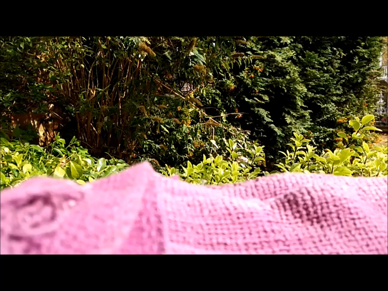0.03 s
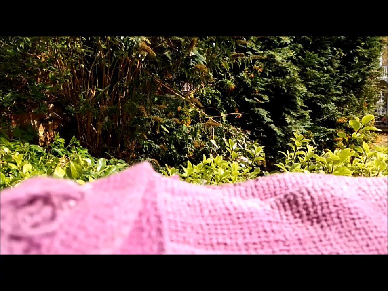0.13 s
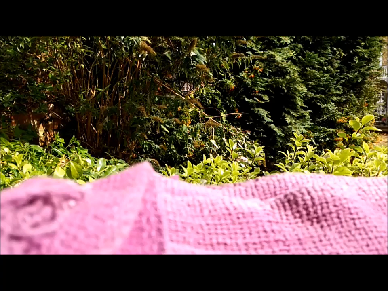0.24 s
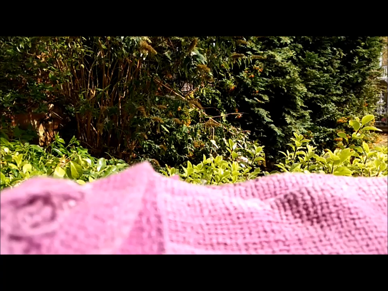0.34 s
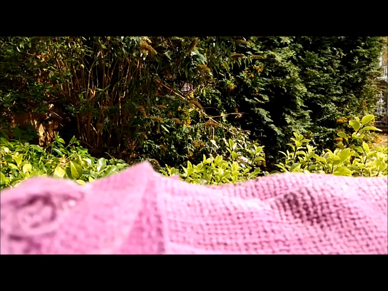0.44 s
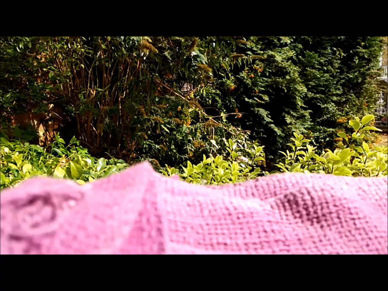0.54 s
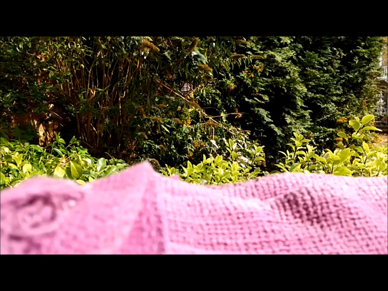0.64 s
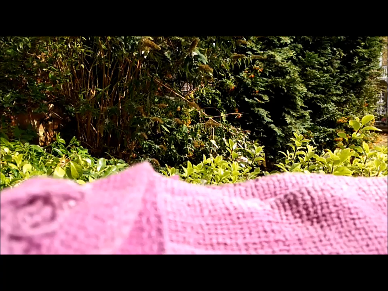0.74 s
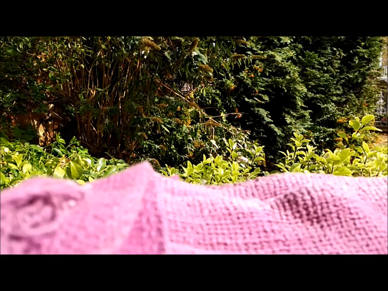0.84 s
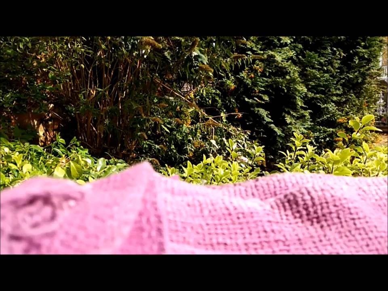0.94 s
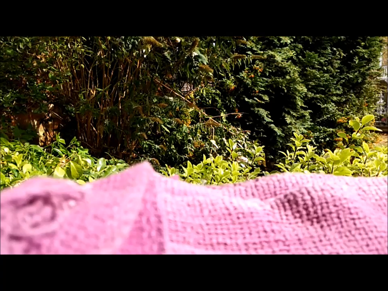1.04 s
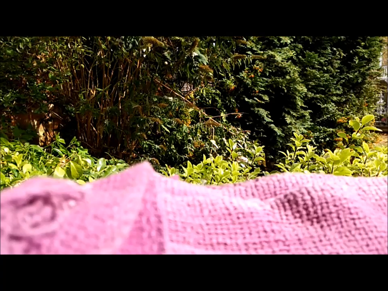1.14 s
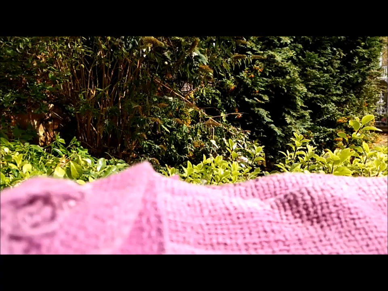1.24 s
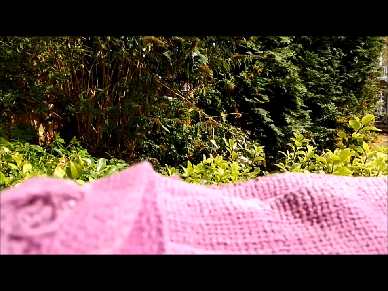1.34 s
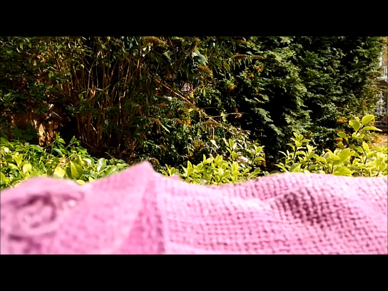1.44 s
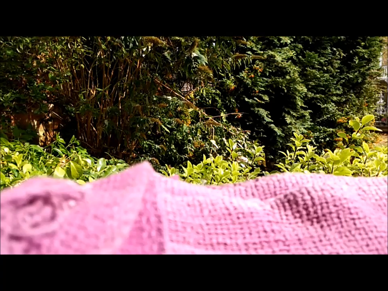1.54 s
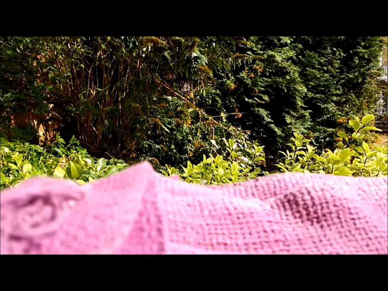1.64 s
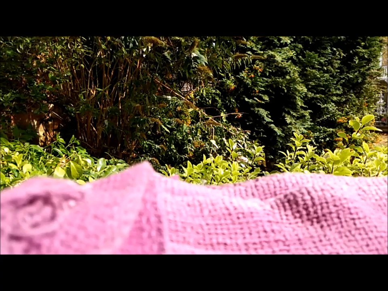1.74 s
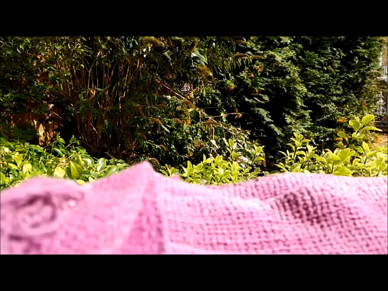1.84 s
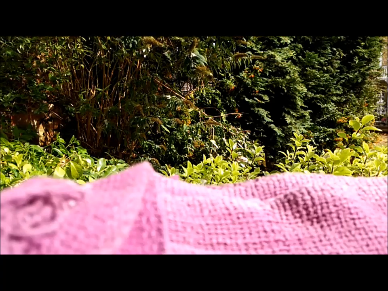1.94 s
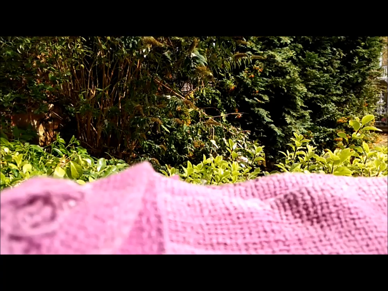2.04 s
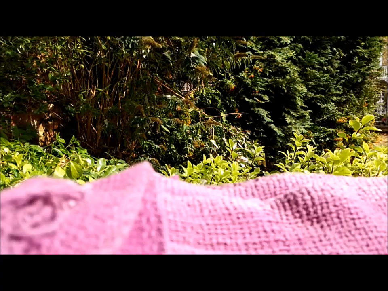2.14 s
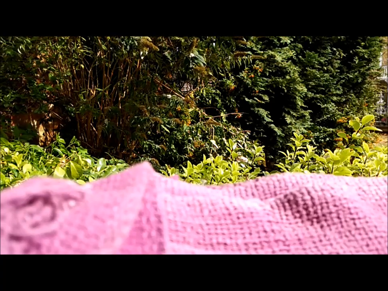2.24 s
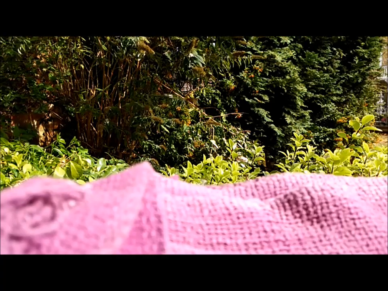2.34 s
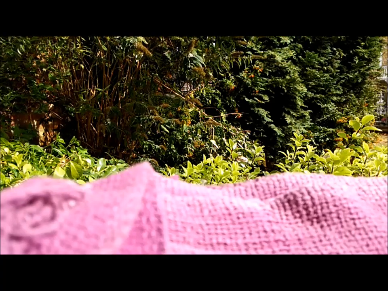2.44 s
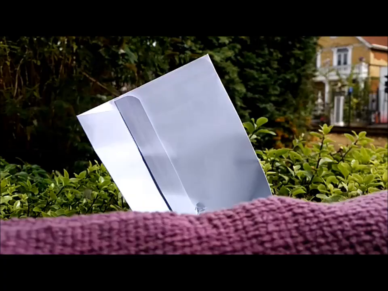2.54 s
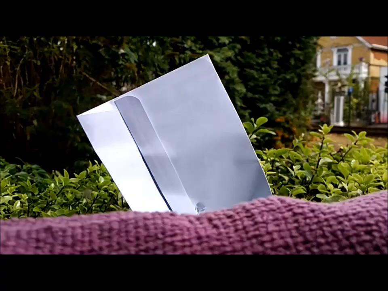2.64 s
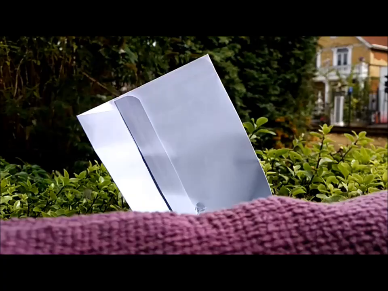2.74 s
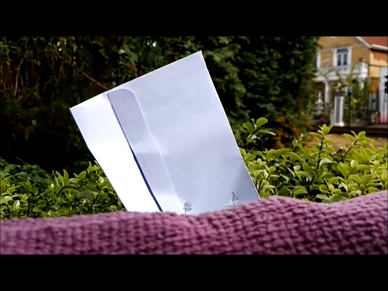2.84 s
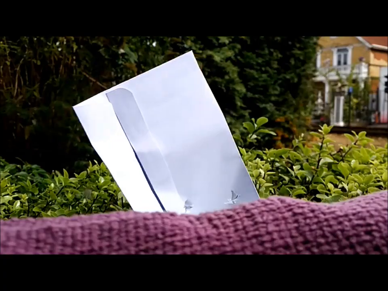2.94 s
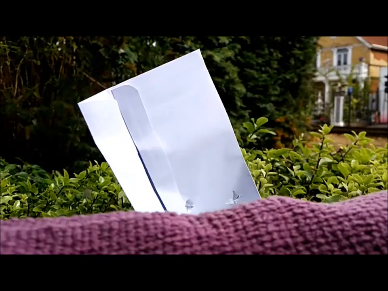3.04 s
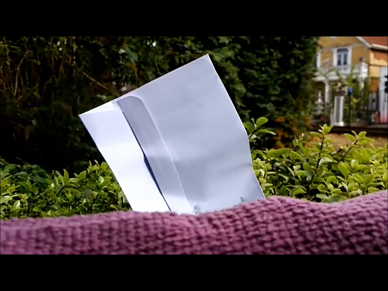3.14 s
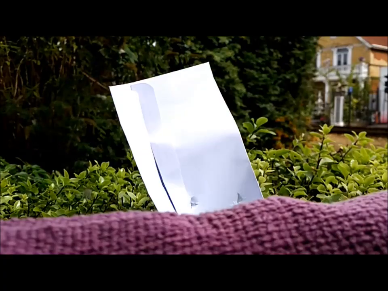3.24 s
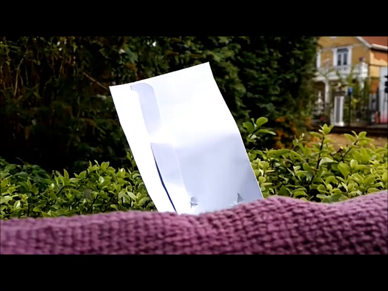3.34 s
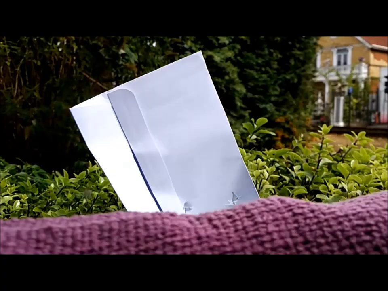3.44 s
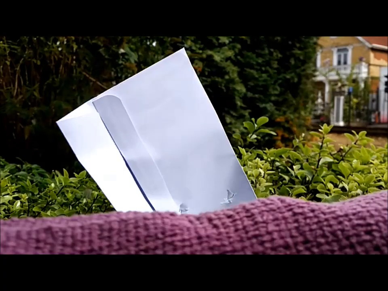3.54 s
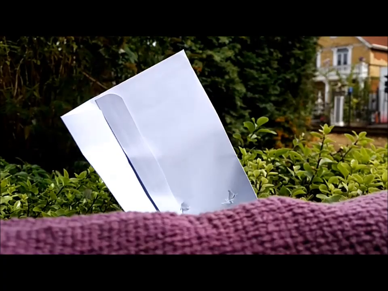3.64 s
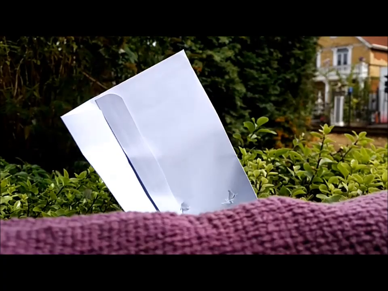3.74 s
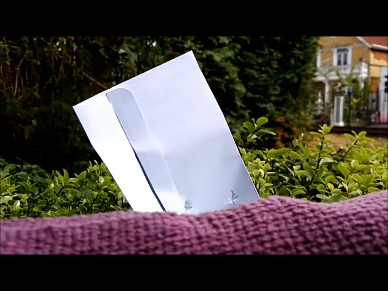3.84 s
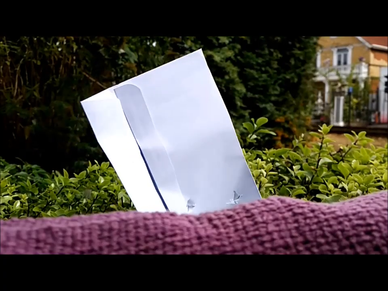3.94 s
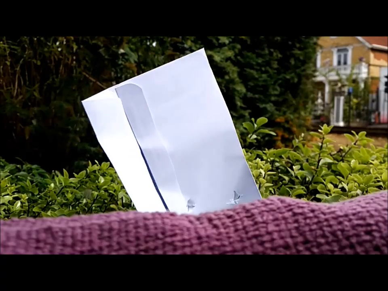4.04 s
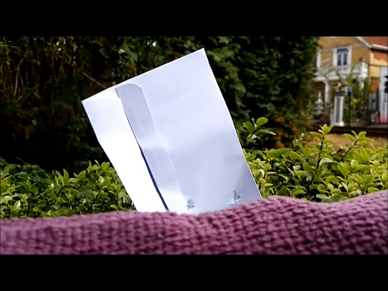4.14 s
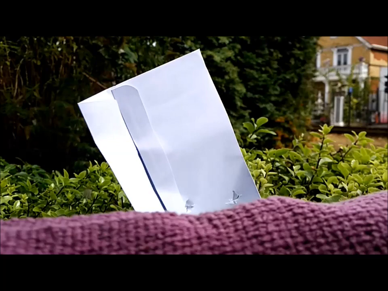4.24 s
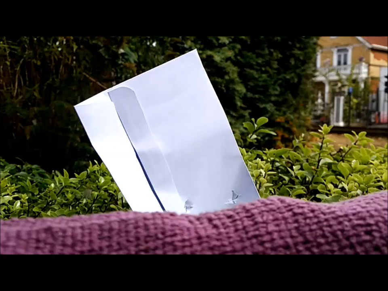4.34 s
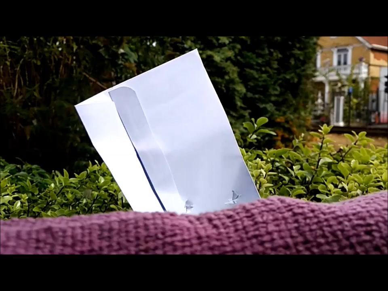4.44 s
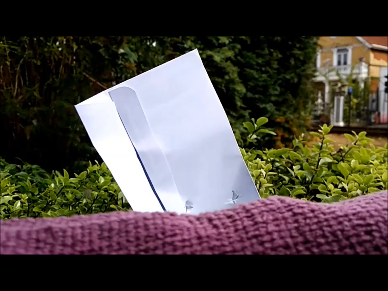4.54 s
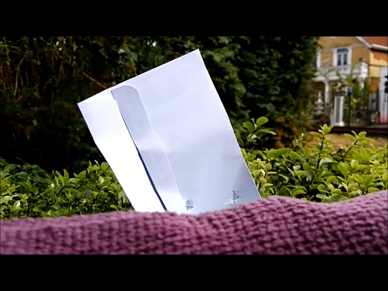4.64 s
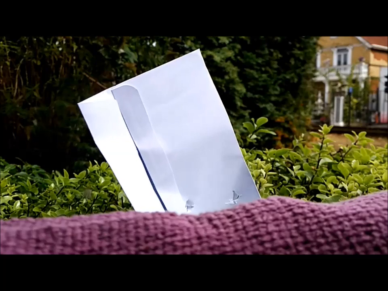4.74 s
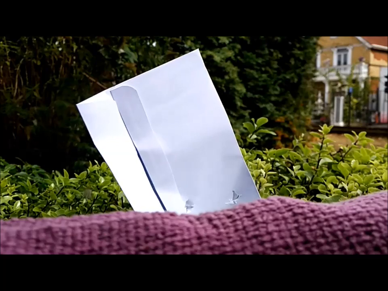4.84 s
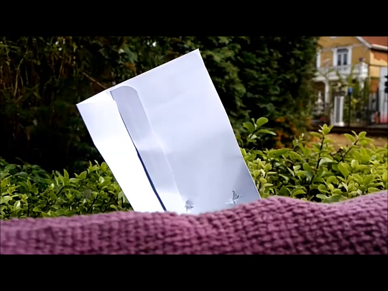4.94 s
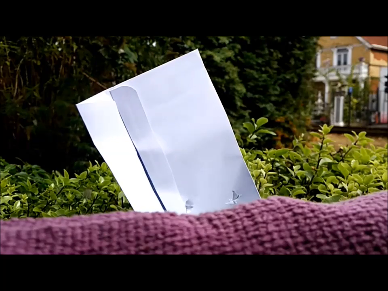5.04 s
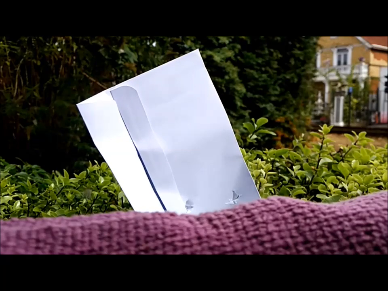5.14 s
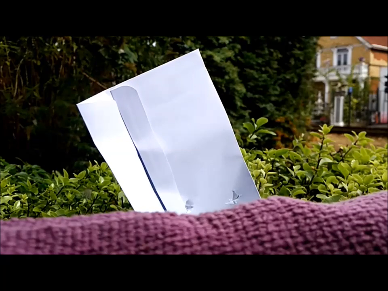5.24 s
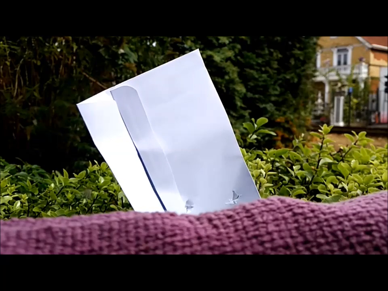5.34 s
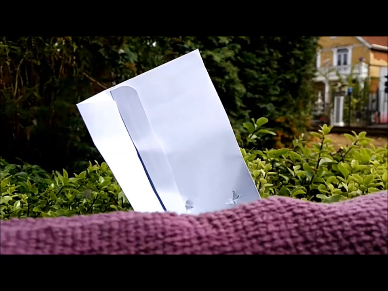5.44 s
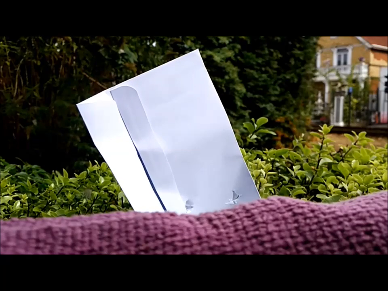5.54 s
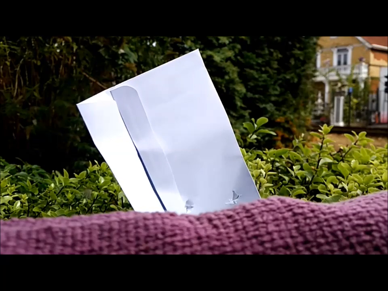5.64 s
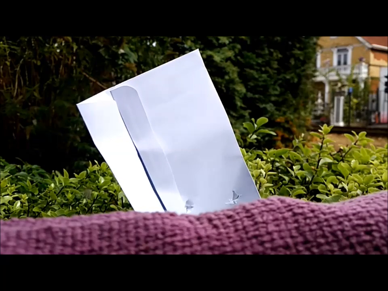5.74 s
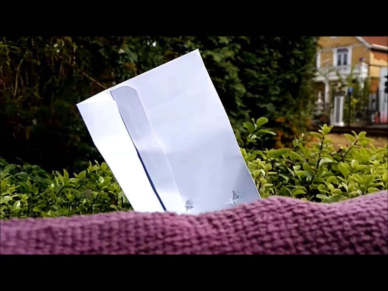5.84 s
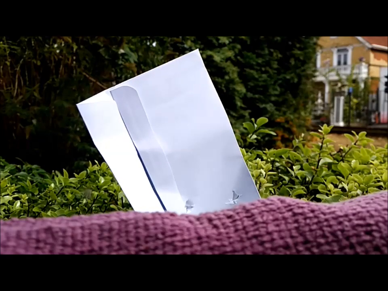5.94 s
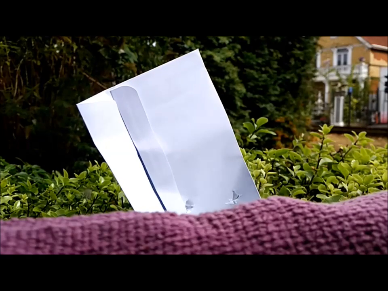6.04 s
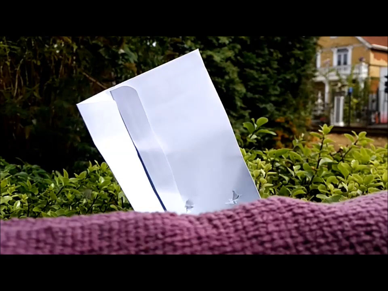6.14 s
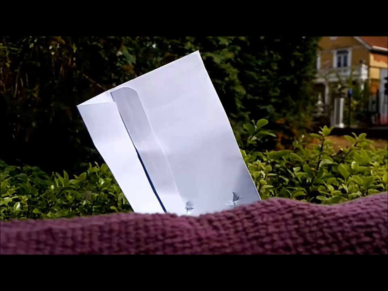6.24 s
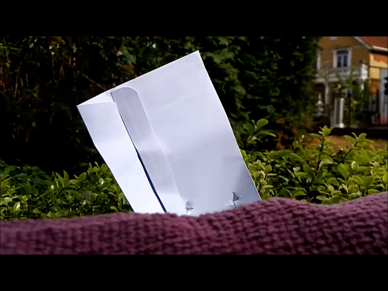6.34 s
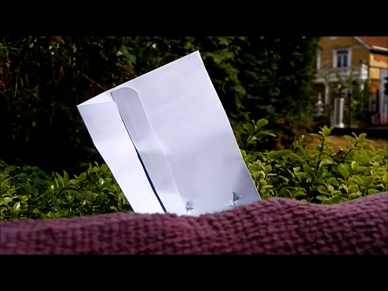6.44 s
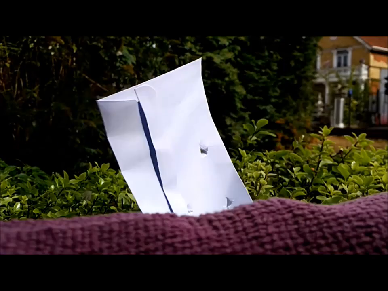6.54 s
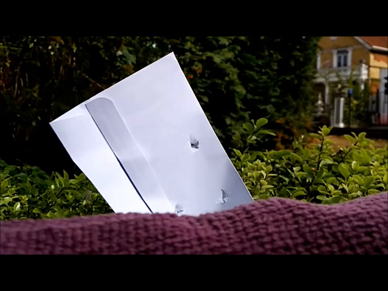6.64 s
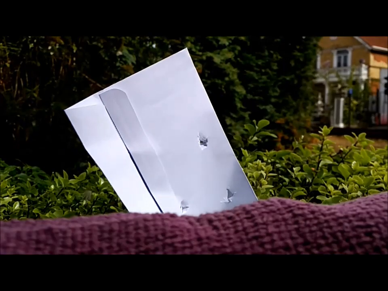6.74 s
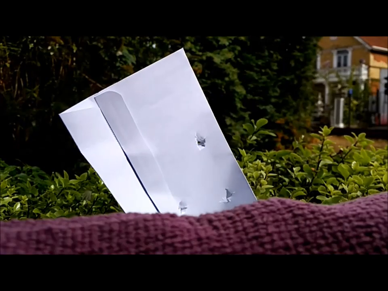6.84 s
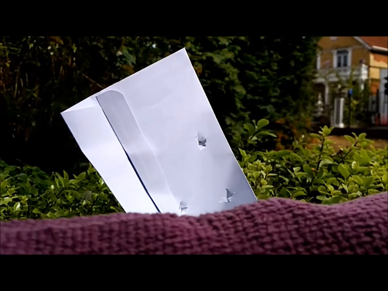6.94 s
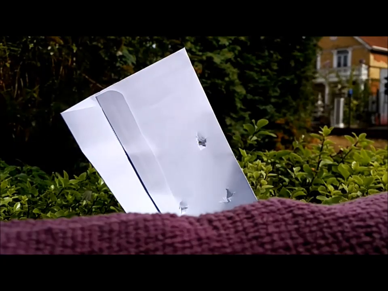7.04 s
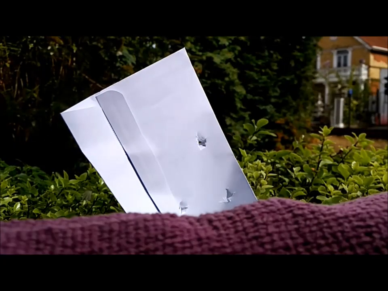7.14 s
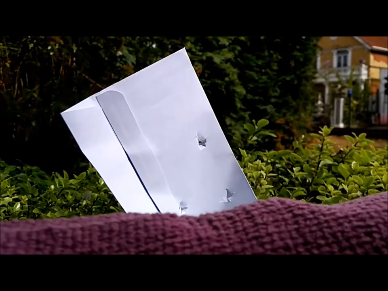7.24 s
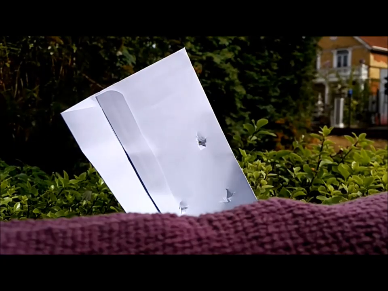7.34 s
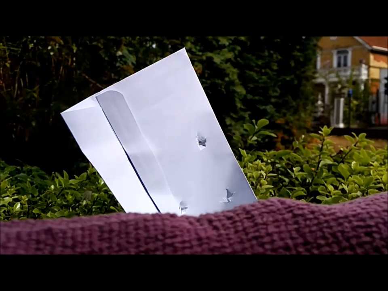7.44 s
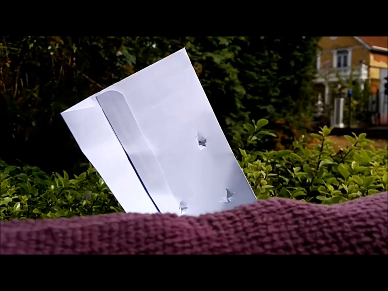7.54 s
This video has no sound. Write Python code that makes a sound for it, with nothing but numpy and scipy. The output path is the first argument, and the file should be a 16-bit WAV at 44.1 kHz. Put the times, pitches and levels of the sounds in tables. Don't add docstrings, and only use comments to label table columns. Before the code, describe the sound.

Slingshot shots pierce a paper envelope on cloth, heard very close outdoors. The first is slowed: small clicks, a low hollow knock, ripping crackle and fading scatter. The second is a bright real-time crack, immediately replayed slow and deep with dull tearing and a long soft tail. The third is another instant snap and hollow slap with a blast of air. Faint air lies between.

```python
import sys
import numpy as np
from scipy import signal
from scipy.fft import rfft, irfft, next_fast_len
from scipy.io import wavfile
from scipy.ndimage import uniform_filter1d

SR = 44100
rng = np.random.default_rng(int(sys.argv[2]) if len(sys.argv) > 2 else 0)


def wrap_up_sound(samples):
    columns = np.atleast_2d(samples).T
    tamed = np.clip(columns, -1, 1)
    steps = np.round(tamed * 32767).astype(np.int16)
    wavfile.write(sys.argv[1], SR, steps)


def amplitude_ratio(level_db):
    exponent = np.asarray(level_db, float) / 20
    return 10 ** exponent


N = 334719
SLOW = 4
GRAIN_DB = 4

# (heard from [s], heard to [s], real time at the start [s], slowed [0-1])
PIECES = [
    (0, 2.313, 0, 1),
    (2.313, 3.152, 2.313, 0),
    (3.152, 6.334, 2.8165, 1),
    (6.35, 7.6, 6.35, 0),
]


def real_time(heard):
    start, _, real, slowed = np.transpose(PIECES)
    k = np.searchsorted(start, heard, side="right") - 1
    return real[k] + (heard - start[k]) / np.where(slowed[k], SLOW, 1)


def in_time(rows):
    heard, *columns = np.transpose(rows)
    return [np.interp(np.arange(N) / SR, real_time(heard), column) for column in columns]


def at_hz(points, hz):
    table_hz, values = np.transpose(points)
    return np.interp(np.log(hz + 1e-9), np.log(table_hz), values)


def rms_one(x):
    return x / np.sqrt(np.mean(x ** 2) + 1e-20)


def pan(db):
    return amplitude_ratio(np.array([[db / 2], [-db / 2]]))


def add(track, heard, sound, delay=0):
    at = int((real_time(heard) + delay) * SR)
    track[:, at:at + sound.shape[1]] += sound[:, :N - at]


def band(noise, hz, octaves):
    edges = np.clip(hz * 2 ** (np.array([-.5, .5]) * octaves), 20, .45 * SR)
    return rms_one(signal.sosfilt(signal.butter(2, edges, "band", fs=SR, output="sos"), noise))


def pair(size, alike):
    mid, side = rng.standard_normal((2, size))
    return np.sqrt(alike) * mid + np.sqrt(1 - alike) * side * np.array([[1], [-1]])


def air(spectrum, stretch, levels):
    # (real frequency [Hz], likeness [-1 to 1])
    likeness = [(60, 1), (180, 0.93), (550, 0.1), (1500, -.15), (4000, .05), (15000, -0.12)]
    size = next_fast_len(N)
    hz = np.fft.rfftfreq(size, 1 / SR)
    alike = np.clip(at_hz(likeness, hz), -.95, .99)
    mid, side = rfft(rng.standard_normal((2, size))) * amplitude_ratio(at_hz(spectrum, hz / stretch))
    both = np.sqrt(1 + alike) * mid + np.sqrt(1 - alike) * side * np.array([[1], [-1]])
    noise = rms_one(irfft(both, size)[:, :N])

    t = np.arange(N) / SR
    first, last = real_time(levels[0][0]), real_time(levels[-1][0])
    inside = (t >= first - 1 / 500) & (t < last + 1 / 500)
    inside = uniform_filter1d(inside * 1., size=160)
    return noise * amplitude_ratio(in_time(levels)[0]) * inside * pan(1.3)


def garden_air():
    # (frequency [Hz], density [dB per Hz])
    first = [(5.9, -22), (10, 6), (27, -2), (118, -14), (210, -17), (292, -19.5), (436, -24), (779, -35.5),
             (1700, -35), (3800, -50), (4100, -55.5), (5330, -90), (9020, -120)]
    brief_air = [(18, -38), (30, -6.5), (86, -2.5), (234, -15.5), (619, -19.5), (705, -21), (942, -19),
                 (2370, -35.5), (7530, -42), (16200, -61)]
    second = [(5.9, -30.5), (10, -0.5), (28, -12), (49, -19.5), (172, -28.5), (205, -26.5), (292, -25),
              (357, -30), (840, -42.5), (3800, -50.5), (4100, -59.5), (5330, -83), (9020, -120)]
    last = [(18, -51), (30, -14), (48, -12.5), (71, 0), (170, -14.5), (356, -11.5), (417, -17), (451, -14),
            (635, -16), (1070, -18.5), (3330, -35), (7340, -37.5), (16200, -59.5)]
    # (time heard [s], level [dB])
    first_db = [(0, -43), (2.309, -42)]
    brief_air_db = [(2.313, -44.5), (2.55, -43)]
    second_db = [(2.552, -50), (3.6, -47.5), (6.328, -50)]
    last_db = [(6.351, -46.5), (7.59, -47.5)]
    slowed = air(first, SLOW, first_db) + air(second, SLOW, second_db)
    return slowed + air(brief_air, 1, brief_air_db) + air(last, 1, last_db)


def engine():
    # (time heard [s], firing rate [Hz], level [dB])
    drive = [(6.36, 63.62, -57), (6.76, 61.3, -57.5), (6.92, 65.12, -47), (7.1, 64.2, -57.5),
             (7.22, 70.57, -48), (7.35, 68.74, -47.5), (7.47, 73.87, -44.5), (7.53, 67.1, -50),
             (7.59, 70.9, -48.5)]
    # (multiple, level [dB])
    orders = [
        (1, 6),
        (2, -9),
        (5, -13.5),
    ]
    hz, db = in_time(drive)
    turn = 2 * np.pi * np.cumsum(hz) / SR
    hum = sum(amplitude_ratio(order_db) * np.sin(k * turn) for k, order_db in orders)
    return np.sqrt(2) * amplitude_ratio(db) * hum * (np.arange(N) > 6 * SR)


def hedge(x):
    # (time heard [s], level [dB])
    send = [
        (1, -13),
        (3, 0),
        (6.6, 1.5),
    ]
    # (frequency [Hz], level [dB])
    colour = [(200, -17.5), (600, -12), (1500, -4.5), (3500, -10), (7500, -5.5), (11000, -11),
              (14000, -12.5), (17000, -10.5)]
    # (frequency [Hz], T60 [s])
    decay = [(300, .1), (2000, .15), (4500, .14), (6500, .17), (9500, .16), (12500, .1), (16000, .06)]
    hedge_db, houses_db, houses_t60 = -13.5, -42.5, 0.79
    t, response = np.arange(SR // 2) / SR, 0
    for low in 150 * 2 ** np.arange(0, 6.9, 1 / 3):
        hz = low * 2 ** (1 / 6)
        fade = amplitude_ratio(hedge_db - 60 * t / at_hz(decay, hz)) + amplitude_ratio(houses_db - 60 * t / houses_t60)
        sos = signal.butter(1, [low, low * 2 ** (1 / 3)], "band", fs=SR, output="sos")
        noise = signal.sosfilt(sos, rng.standard_normal((2, len(t))))
        response = response + amplitude_ratio(at_hz(colour, hz) - 14) * fade * noise
    response = response * np.clip(t / .005, 0, 1)
    sent = (x * amplitude_ratio(in_time(send)[0])).mean(axis=0, keepdims=True)
    return signal.oaconvolve(sent, response, axes=1)[:, :N]


def swells():
    # (time heard [s], peak [dB], real frequency [Hz], width [octaves], real length [s])
    lone = [
        (1.171, -53.5, 10500, 1.35, 0.049),
        (1.269, -63, 10200, 1.2, 0.036),
        (1.589, -65, 6780, .06, .045),
        (1.705, -65, 6830, 0.058, 0.067),
        (2.662, -55.5, 313, 0.099, 0.13),
        (2.756, -58.5, 310, 0.078, 0.11),
        (4.648, -53.5, 7800, 0.69, 0.02),
        (4.683, -65.5, 7450, 0.83, 0.04),
    ]
    # (time heard [s], strength [dB])
    hits = [
        (3.472, -3.5),
        (6.674, -3),
    ]
    # (real delay [s], level [dB], real frequency [Hz], width [octaves], real length [s])
    walls = [
        (0.025, -37, 12550, .8, .05),
        (.03, -44.5, 2777, 2.7, .07),
        (0.053, -46.5, 7904, 0.94, 0.069),
        (.158, -51.5, 6800, .8, .06),
    ]
    out = np.zeros((2, N))
    rows = [(s, 0, *rest) for s, *rest in lone]
    rows += [(s, delay, hit_db + db, *rest) for s, hit_db in hits for delay, db, *rest in walls]
    for s, delay, db, hz, octaves, length in rows:
        u = np.arange(4096) / SR / length
        noise = band(pair(size=len(u), alike=.55), hz, octaves)
        add(out, s, amplitude_ratio(db) * noise * 4 * u * np.exp(1 - 4 * u), delay)
    return out


def swing_wave(swing, hz, rise, cycles, pan_db=0):
    t = np.arange(8192) / SR
    wave = np.sin(2 * np.pi * hz * t) * (1 - np.exp(-t * hz / rise)) * amplitude_ratio(-60 * t * hz / cycles)
    return swing * amplitude_ratio(np.minimum(0, [[pan_db], [-pan_db]])) * wave


def burst(db, hz, octaves, t60, grain_db):
    t = np.arange(4096) / SR
    alike = np.clip(1 - hz / 12000, .45, .97)
    grain = pair(size=len(t), alike=alike) * amplitude_ratio(grain_db * rng.standard_normal(len(t) // 8).repeat(8))
    noise = band(grain, hz, octaves) * (1 - np.exp(-t / .0001)) * amplitude_ratio(-60 * t / t60)
    return amplitude_ratio(db) * noise / np.abs(noise).max(axis=1, keepdims=True)


def ticks():
    # (time heard [s], peak [dB], real frequency [Hz])
    rows = [(1.001, -39.5, 3870), (1.031, -21.5, 4850), (1.067, -26, 3500), (1.08, -17.5, 6600),
            (2.61, -43.5, 4000), (3.293, -49, 7580), (3.385, -38.5, 4330), (4.232, -40.5, 1480),
            (4.663, -42, 7380), (5.054, -48.5, 4570), (6.659, -36.5, 5900), (6.665, -40, 4000),
            (7.338, -58.5, 4040)]
    out = np.zeros((2, N))
    for s, db, hz in rows:
        add(out, s, burst(db, hz, octaves=.8, t60=.008, grain_db=GRAIN_DB))
    return out


def thuds():
    # (time heard [s], peak [dB], real frequency [Hz], real T60 [s])
    rows = [(1.026, -23.5, 3400, 0.018), (1.042, -26, 3500, 0.024), (1.056, -25, 3500, 0.035),
            (1.075, -10, 331, .05), (1.095, -23.5, 645, 0.08), (1.13, -21, 480, 0.078),
            (3.484, -8.5, 419.7, 0.023), (3.49, -20.5, 199.7, 0.11), (3.496, -9.5, 1720, 0.025),
            (3.5398, -9.5, 889.6, .016), (3.585, -22, 2204, 0.021), (6.678, -5, 1406, 0.016),
            (6.677, -4, 419, .044)]
    out = np.zeros((2, N))
    for s, db, hz, t60 in rows:
        add(out, s, burst(db, hz, 1.194, t60, GRAIN_DB))
    return out


def rustles():
    # (time heard [s], peak [dB], real frequency [Hz], real T60 [s])
    rows = [(1.09, -23.5, 8000, .015), (1.134, -24.5, 8000, .02), (1.18, -34.5, 8900, 0.034),
            (3.414, -42, 5070, .03), (3.44, -46, 4998, 0.035), (3.462, -30, 5002, .02),
            (3.476, -9, 3246, 0.044), (3.51, -9.5, 3494, .04), (3.578, -11.5, 10730, 0.063),
            (3.606, -23, 8884, 0.025), (6.6705, -24, 2978, 0.015), (6.678, -7.5, 2997, 0.027),
            (6.6835, -3, 4910, .012), (6.692, -10.5, 7840, .035)]
    out = np.zeros((2, N))
    for s, db, hz, t60 in rows:
        add(out, s, burst(db, hz, 1.7, t60, GRAIN_DB))
    return out


def puffs():
    # (time heard [s], swing, real frequency [Hz], T60 [cycles], left over right [dB])
    rows = [
        (3.52, 0.38, 57, 5, 11.5),
        (3.685, 0.21, 130, 2.6, 15.5),
        (3.699, 0.27, 60, 6.7, 30.5),
        (6.6842, -.5, 330, 2.6, 1),
        (6.687, 2, 300, 1.2, 5.5),
        (6.6897, -0.8, 115, 2.3, 5.5),
        (6.6937, 0.61, 53, 4.7, 8.5),
    ]
    rise_cycles = .0013 * 60
    out = np.zeros((2, N))
    for s, swing, hz, cycles, pan_db in rows:
        add(out, s, swing_wave(swing, hz, rise_cycles, cycles, pan_db))
    return out


def rings():
    # (time heard [s], swing, real frequency [Hz], rise [cycles])
    rows = [
        (1.03, .08, 800, 1.6),
        (1.066, .2, 260, .8),
        (1.0692, 2.9, 860, 5.2),
        (1.091, .3, 1000, 1.1),
        (1.118, -.15, 330, .66),
        (1.125, .22, 980, .9),
        (1.16, .1, 900, .9),
        (3.4915, .95, 1250, .5),
        (6.6768, .6, 1150, .35),
    ]
    out = np.zeros((2, N))
    for s, swing, hz, rise in rows:
        add(out, s, swing_wave(swing, hz, rise, cycles=15.5))
    return out


def slaps():
    # (time heard [s], swing, real frequency [Hz])
    rows = [
        (1.0785, 1.6, 760),
        (3.4768, 7.0, 680),
        (6.6748, 5.5, 620),
    ]
    out = np.zeros((2, N))
    for s, swing, hz in rows:
        add(out, s, swing_wave(swing, hz, rise=.65, cycles=3.1))
    return out


def cracks():
    # (time heard [s], peak [dB], real frequency [Hz])
    rows = [(1.1045, 3.5, 11520), (1.1072, 2, 10520), (1.111, -3, 11640), (1.1154, -4, 10960),
            (3.4723, 1.5, 6200), (3.485, -7, 5500), (3.4938, 2, 5500), (3.505, 1.5, 7400), (3.539, 5, 7680),
            (3.549, -2.5, 8000), (3.5627, -4, 8000), (3.568, -7.5, 8500), (6.6733, -7, 3500),
            (6.677, -1.5, 4000), (6.6816, -4.5, 7115), (6.6872, 5.5, 5957)]
    out = np.zeros((2, N))
    for s, db, hz in rows:
        crack = burst(db, hz, octaves=1.6, t60=.003, grain_db=4)
        tear = burst(db - 9.5, hz, octaves=1.7, t60=.024, grain_db=GRAIN_DB)
        add(out, s, crack + tear)
    return out


def ports(x):
    # (frequency [Hz], width [Hz], lift [dB])
    cavities = [
        (8000, 3000, 1),
        (7760, 3000, 2.5),
    ]
    lifted = []
    for side, (hz, width, db) in zip(x, cavities):
        resonance = signal.lfilter(*signal.iirpeak(hz, hz / width, fs=SR), side)
        lifted.append(side + (amplitude_ratio(db) - 1) * resonance)
    return signal.sosfilt(signal.butter(1, 10700, fs=SR, output="sos"), lifted)


def joined(real):
    out = np.zeros((2, N + SR))
    for start, end, real_start, slowed in PIECES:
        a, b, r = round(start * SR), round(end * SR), round(real_start * SR)
        size = b - a
        piece = real[:, r:r + size]
        if slowed:
            source = piece[:, :size // SLOW + 64]
            piece = signal.resample_poly(source, SLOW, 1, axis=1, window=("kaiser", 12))
        piece = piece[:, :size]
        edge = np.minimum(np.arange(size), np.arange(size)[::-1])[:piece.shape[1]]
        out[:, a:a + piece.shape[1]] = piece * np.clip(edge / 60, 0, 1)
    return out[:, :N]


def scene():
    garden = garden_air() + engine()
    snaps = ticks() + thuds() + rustles() + cracks()
    swings = puffs() + rings() + slaps()
    shots = ports(snaps + swings + hedge(snaps) + swells())
    loaded = 1.227 * np.tanh((shots + garden) / 1.168)
    top_cut = signal.cheby2(12, 80, 17700, fs=SR, output="sos")
    return joined(signal.sosfilt(top_cut, loaded))


def low_pass(x):
    return signal.sosfilt(signal.butter(12, 16310, fs=SR, output="sos"), x)


def record(dry):
    hiss = amplitude_ratio(-101) * rng.standard_normal(dry.shape)
    mix = np.clip(dry, -1, 1) + hiss
    return low_pass(mix)


dry = scene()
out = record(dry)
wrap_up_sound(out)
```